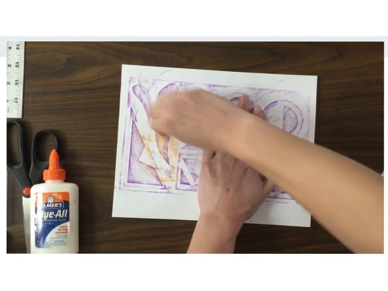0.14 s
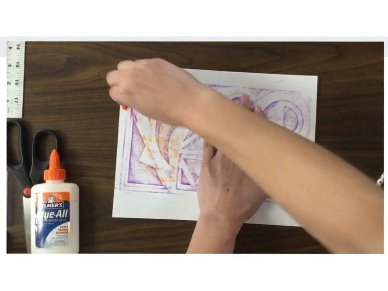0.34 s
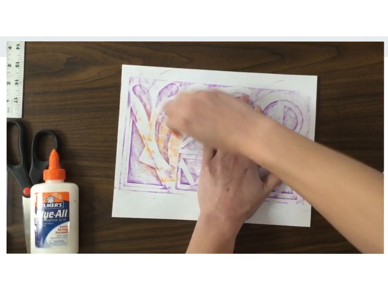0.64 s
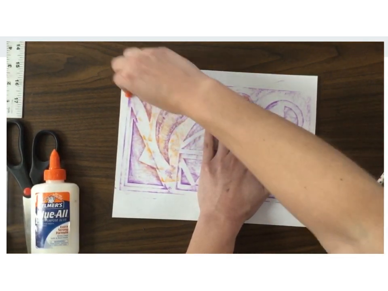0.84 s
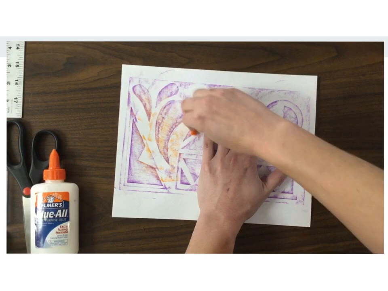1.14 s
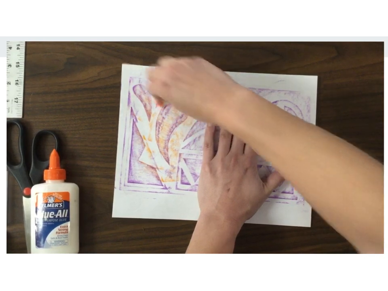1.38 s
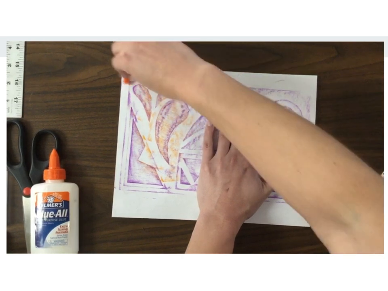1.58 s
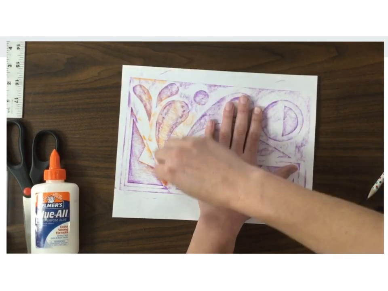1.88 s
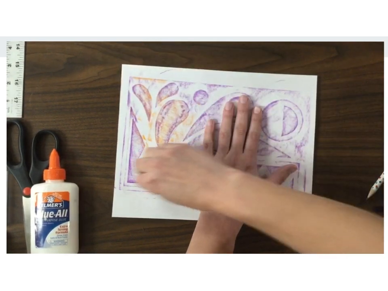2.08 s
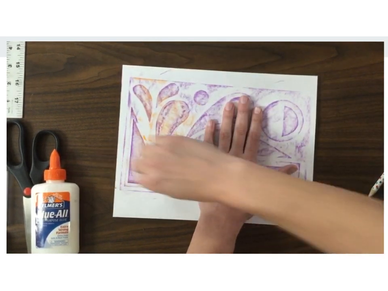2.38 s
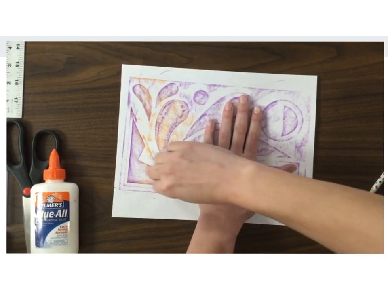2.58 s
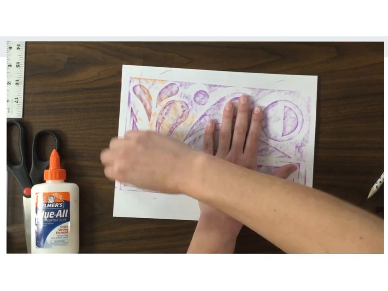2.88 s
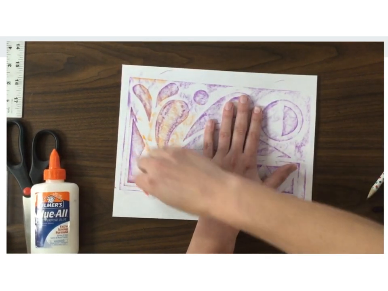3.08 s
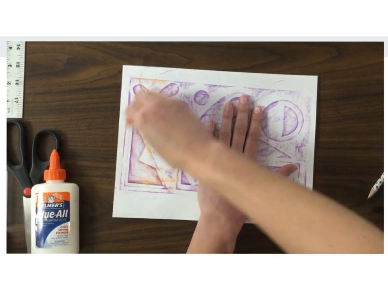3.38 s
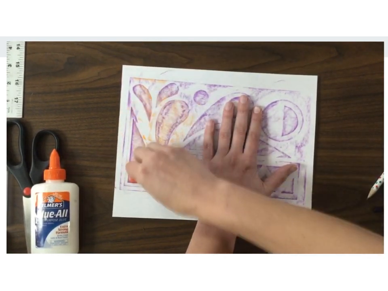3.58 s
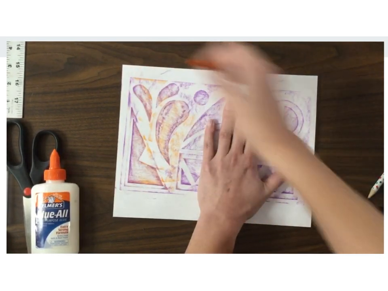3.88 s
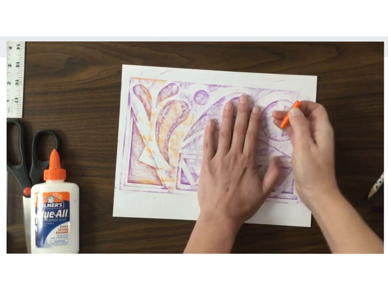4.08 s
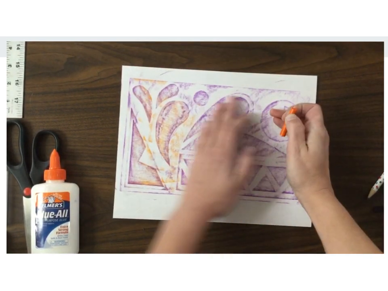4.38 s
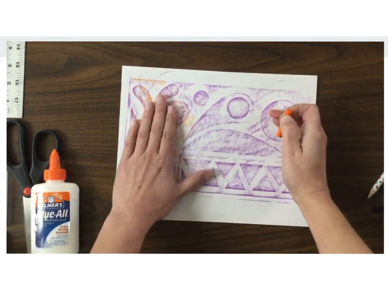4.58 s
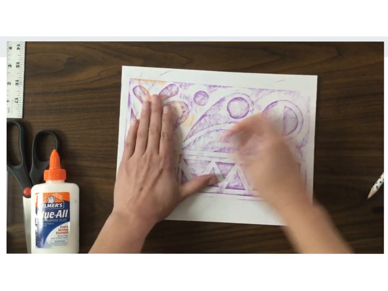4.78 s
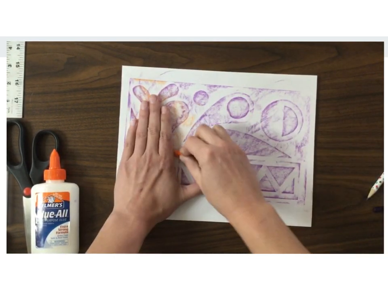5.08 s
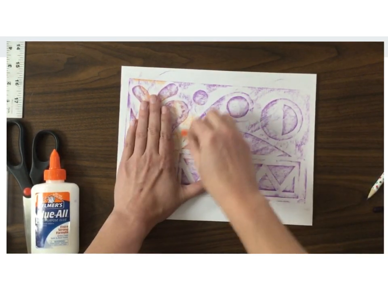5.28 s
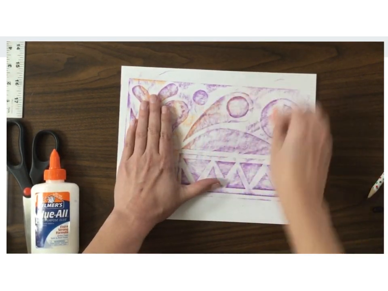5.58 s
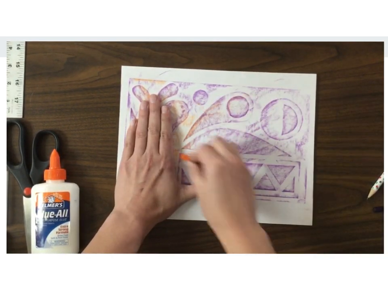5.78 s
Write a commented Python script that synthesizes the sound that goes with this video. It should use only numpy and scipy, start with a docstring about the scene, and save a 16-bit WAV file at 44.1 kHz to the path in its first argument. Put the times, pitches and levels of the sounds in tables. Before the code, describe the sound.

In a small quiet room with a steady low fan hum, a crayon taps down on paper over a textured board and rubs in short, hissing strokes with dull ridge thuds. Softer strokes and taps follow, then a quick rasp. A hand slides brightly over the faintly crinkling sheet before brief rubbing resumes. Close microphone, little reverberation.

```python
"""A fan hums throughout in a quiet room: wavering sines over a drone and filtered noise.
A crayon taps paper on a textured board on a wooden desk: noise bursts and damped desk modes.
It is rubbed in short strokes: filtered friction slips rasp on the fibres, and ridges underneath thud in the desk.
Later the sheet crinkles faintly in sparse ticks while a hand slides over it with a finer, brighter hiss.
Strokes and taps return until the end; a faint decaying noise tail stands for the room."""
import sys
import numpy as np
from scipy import signal
from scipy.fft import rfft, irfft, next_fast_len
from scipy.io import wavfile
from scipy.ndimage import uniform_filter1d, map_coordinates

SR = 44100
rng = np.random.default_rng(int(sys.argv[2]) if len(sys.argv) > 2 else 0)


def waveform_to_disk(signal):
    """Save audio, clipped to [-1, 1], as 16-bit WAV at the path in sys.argv[1]."""
    frames = np.transpose(np.atleast_2d(signal))
    scaled = np.clip(frames, -1, 1) * 32767
    samples = np.round(scaled).astype(np.int16)
    wavfile.write(sys.argv[1], SR, samples)


N = 261954
TIME = np.arange(N) / SR

# crayon strokes, levels before the trims of each sound; a negative swell starts loud and sinks:
# start_s, fastest_s, end_s, hiss_db, hiss_swell_db, rasp_db, rasp_swell_db, desk_rumble_db,
# boom_db (the deepest desk mode relative to the rest)
STROKE_MOVES = [ (0.101, 0.257, .39, -60, 12.5, -59, 20, -52, -10),
                (.635, 0.823, 0.955, -60, 9.5, -66, -6, -55.5, 1),
                (1.214, 1.52, 1.65, -60.5, 11.5, -70.5, 0.5, -52.5, -3),
                (2.017, 2.198, 2.323, -61.5, 13.5, -76.5, -3, -64, 6.5),
                (2.595, 2.797, 2.97, -66.5, 1.5, -76, 1, -61, 3),
                (3.175, 3.406, 3.458, -55.5, 18.5, -60, 23, -64.5, -12),
                (3.659, 3.764, 3.81, -53.5, 7, -53.5, 11, -61.5, -11),
                (4.93, 4.997, 5.25, -74, 12, -80.5, 2, -76, -8),
                (5.155, 5.17, 5.215, -65.5, 12, -66.5, 16, -60, -7),
                (5.281, 5.555, 5.6, -57.5, 10.5, -62, 19, -63.5, -23),
                (5.902, 5.935, 6.15, -74.5, -4, -79, 7, -65, -13)]
# resonances of desk and board, before random scatter: pitch_hz, ring_t60_s, level_db
DESK_MODES = [(64, .18, -12.5), (73.3, 0.89, -7), (104, .07, -1.5), (130, 0.11, -0.4), (175, 0.037, 1),
              (202.5, 0.078, 1.5), (233.4, .042, -0.5), (317, .06, -10.5), (387, .033, -18),
              (565, .028, -29)]
# spectrum of friction on paper fibres: frequency_hz, relative_level_db
HISS_SPECTRUM = [(1500, -27), (3500, -10), (5500, -7.5), (7000, -4.5), (8000, -4), (9300, -3),
                 (11500, -2.5), (13500, -6.5), (15500, -17)]
# spectrum of the coarser rasp under pressure: frequency_hz, relative_level_db
RASP_SPECTRUM = [(400, 5.5), (800, 0), (1400, 4), (2000, 0), (2600, -7.5), (3300, -5), (3900, -7.5),
                 (4500, -3), (5700, -17), (8000, -23)]

TOUCH_S, SWELL_SHAPE = 0.014, 1.09  # time to make full contact; bend of the swell
CRAYON_BRAKE, HAND_BRAKE = 1.02, 2.65  # the higher, the longer a movement keeps its speed before it stops
HISS_POWER, RASP_POWER = 1.12, 1.8  # how steeply each sound falls with the speed


def undb(db):
    """Decibels are logarithmic: return the amplitude gain."""
    return 10 ** (np.asarray(db) / 20)


def unit(x):
    """Normalization: scale to rms 1."""
    return x / np.sqrt(np.mean(x ** 2) + 1e-30)


def strength(x, window_s=0.00072):
    """Short-time power: scale a blow so that its loudest moment has rms 1."""
    power = uniform_filter1d(x ** 2, max(int(window_s * SR), 1))
    return x / np.sqrt(power.max())


def add(out, start, x):
    """Superposition: mix a short sound in at a time in seconds."""
    i = max(int(start * SR), 0)
    out[i:i + len(x)] += x[:max(N - i, 0)]


def colour(x, points):
    """Linear filtering by a spectrum of (Hz, dB) points, which falls away above its last point."""
    hz, db = np.transpose(points)
    size = next_fast_len(len(x) + 512)
    octave = np.log2(np.maximum(np.fft.rfftfreq(size, 1 / SR), .1))
    beyond = np.maximum(octave - np.log2(hz[-1]), 0)
    gain = undb(np.interp(octave, np.log2(hz), db) - 20 * beyond)
    return irfft(rfft(x, size) * gain, size)[:len(x)]


def walk(rate):
    """Low-passed noise makes a slow random fluctuation with rms 1."""
    return unit(colour(rng.standard_normal(N), [(rate, 0), (4 * rate, -40), (16 * rate, -120)]))


def fan():
    """Periodic hum with weaker frequency-modulated tones, over a drone and a soft rush of air."""
    # level of the hum, before its trim: time_s, level_db
    hum_levels = [(0.0, -56.5), (0.43, -64), (1.26, -58), (1.47, -55.5), (1.87, -54.5), (2.98, -61.5),
                  (4.32, -60), (4.83, -57.5), (5.39, -58), (5.94, -69)]
    # wavering tones: pitch_hz, width_hz (rate of wavering; twice the rms pitch deviation), level_db
    tone_bands = [(329, 20, -81.5), (358.3, 13.1, -74.5), (613.6, 8, -83), (709, 5.6, -81),
                  (690.5, 5, -82.5), (808, 4.9, -87), (1022, 6.7, -91.5), (1075, 11, -91),
                  (1364, 10, -96.5)]
    # spectrum of the drone: frequency_hz, relative_level_db
    drone_spectrum = [(25, -14), (45, -1.5), (70, 0.5), (140, 6.5), (220, -8.5), (280, -11), (360, 1),
                      (420, -13), (500, -18), (680, -14.5), (850, -22.5), (1100, -32.5)]
    # spectrum of the air: frequency_hz, relative_level_db
    air_spectrum = [(500, -21), (880, -3), (1400, -2), (1900, -5.5), (2500, -9.5), (3300, -14),
                    (5000, -16.5), (7000, -18), (10000, -15.5), (13000, -17.5), (15000, -24.5)]
    hum_hz, hum_trim_db, drone_db, air_db = 170.9, 1.0, -63.5, -80

    s, db = np.transpose(hum_levels)
    hum_phase = 2 * np.pi * np.cumsum(hum_hz + 0.63 * walk(3.7)) / SR
    # sqrt(2) gives each sine rms 1
    hum = np.sqrt(2) * np.sin(hum_phase) * undb(np.interp(TIME, s, db) + hum_trim_db)
    tones = np.zeros(N)
    for hz, width, level_db in tone_bands:
        phase = 2 * np.pi * np.cumsum(hz + width / 2 * walk(width)) / SR
        tones += undb(level_db) * np.sqrt(2) * np.cos(phase)
    drone = undb(drone_db) * unit(colour(rng.standard_normal(N), drone_spectrum))
    air = undb(air_db) * unit(colour(rng.standard_normal(N), air_spectrum))
    return hum + tones + drone + air


def ring(push, modes, detune, scatter_db=3.0):
    """Modal resonance: a push rings damped modes, whose pitch and strength shift with the place of contact."""
    t = TIME[:SR // 4]
    body = np.zeros(len(t))
    for hz, t60, db in modes:
        shift, swing = rng.standard_normal(2)
        decay = np.exp(-np.log(1000) * t / t60)
        body += undb(db + scatter_db * swing) * np.sin(2 * np.pi * hz * (1 + detune * shift) * t) * decay
    return signal.fftconvolve(push, body)[:len(push)]


def chatter(rise_s, fall_s, tail_db, tail_s):
    """Impact noise: a burst of tiny contacts dies quickly, with a faint flutter of the sheet after it."""
    t = TIME[:SR // 8]
    decay = np.exp(-t / fall_s) + undb(tail_db) * np.exp(-t / tail_s)
    return rng.standard_normal(len(t)) * (1 - np.exp(-t / rise_s)) * decay


def graze(lead_s, fade_s=0.0023):
    """Sliding friction: the crayon skims the paper for a moment before it lands."""
    t = TIME[:SR // 16]
    skim = rng.standard_normal(len(t)) * np.exp(-np.maximum(t - lead_s, 0) / fade_s)
    return strength(colour(skim, HISS_SPECTRUM))


def thud(hz):
    """Forced vibration: the board is pressed down and springs back; a slower push gives a deeper thud."""
    phase = 1.272 * hz * TIME[:SR // 4]
    push = np.sin(2 * np.pi * phase) * (phase < 1)  # one cycle
    return strength(ring(push, DESK_MODES, 0.015), 0.0043)


def taps(thud_lag_s=0.0016, stick_db=-1, sheet_db=-5, graze_db=-29):
    """Impact excitation: the crayon grazes the sheet, clicks, slaps it onto the board, and the desk answers."""
    # touches: time_s, click_db, treble_db, knock_db, thud_db, thud_hz (scales the push rate),
    # sheet_hz, stick_hz (rings, before random detuning), lead_s (graze ahead of the click)
    touches = [ (.064, -51.5, -46.5, -44.5, -33.5, 122, 1100, 7000, .005),
               (.6186, -33.5, -35, -33.5, -33, 103, 1370, 6970, .0045),
               (1.183, -53, -54.5, -54, -40.5, 82, 1097, 5030, 0.0034),
               (1.6065, -67, -54, -65, -48.5, 119, 1495, 10000, 0.00094),
               (1.988, -51.5, -53, -51, -43, 120, 616, 5470, .008),
               (2.521, -54.5, -53, -46.5, -45.5, 148, 492, 3300, 0.0042),
               (3.163, -67, -64, -63, -62, 119, 1740, 4430, 0.0012),
               (3.172, -66, -56.5, -68, -57, 101, 1300, 7300, .003),
               (3.643, -48, -53.5, -49, -41.5, 84, 1400, 4650, 0.0048),
               (4.115, -56, -53, -45.5, -46, 199, 464, 3360, 0.0082),
               (4.346, -57, -57, -60, -73, 151, 1780, 6350, .004),
               (4.9885, -70, -67, -73, -61, 154, 1400, 6330, 0.00095),
               (5.8943, -53.5, -48, -54.5, -39, 136, 400, 3080, 0.00096)]
    # spectra of click, knock and treble tick: frequency_hz, relative_level_db
    click_spectrum = [(1500, -15), (2400, -0.5), (2750, -4), (3100, 2.5), (3550, -5.5), (4200, 1),
                      (5000, -3.5), (5700, -11.5), (6400, -6)]
    knock_spectrum = [(250, 7), (450, 0), (700, -19.5), (1050, 1), (1400, -1), (1800, -5), (2300, -15.5)]
    tick_spectrum = [(4000, -20.5), (5700, -19.5), (6700, -3.5), (8200, 5), (9500, -1.5), (12000, -4.5),
                     (15500, -12)]

    out = np.zeros(N)
    for s, click_db, treble_db, knock_db, thud_db, thud_hz, sheet_hz, stick_hz, lead_s in touches:
        contact = chatter(rise_s=.0002, fall_s=0.0024, tail_db=-12.5, tail_s=0.0096)
        slap = chatter(rise_s=.0004, fall_s=0.0032, tail_db=-12.5, tail_s=0.013)
        crackle = chatter(rise_s=.0001, fall_s=0.0013, tail_db=-13, tail_s=0.0094)
        stick = strength(ring(crackle, [(stick_hz, .004, 0)], 0.0045))
        click = strength(colour(contact, click_spectrum)) + undb(stick_db) * stick
        # the sheet rings for a dozen cycles or so, hence longer at a low pitch
        sheet = strength(ring(contact, [(sheet_hz, 14 / sheet_hz, 0)], .01))
        knock = strength(colour(slap, knock_spectrum)) + undb(sheet_db) * sheet
        tick = strength(colour(crackle, tick_spectrum))
        # the graze grows more slowly with force than the treble tick does
        add(out, s - lead_s, undb(.5 * treble_db + graze_db) * graze(lead_s))
        add(out, s, undb(click_db) * click + undb(treble_db) * tick + undb(knock_db) * strength(knock))
        add(out, s + thud_lag_s, undb(thud_db) * thud(thud_hz))
    return out


def slips(rate, spread_db):
    """Stick-slip: tiny random releases of friction, a few much larger than the rest; rate is per second."""
    happens = rng.random(N) < rate / SR
    size = undb(spread_db * np.clip(rng.standard_normal(N), -2, 2))
    return unit(happens * rng.choice([-1, 1], N) * size)


def wander(x, spread_db, patch_hz, patch_s):
    """Moving excitation: the sheet's resonances come and go as the point of contact moves across it."""
    hz, s, bins = signal.stft(x, SR, nperseg=512)
    field = rng.standard_normal((256, 512))
    place = np.meshgrid(hz / patch_hz, s / patch_s, indexing="ij")
    gain = undb(spread_db * map_coordinates(field, place, order=2, mode="mirror"))
    return unit(signal.istft(bins * gain, SR)[1][:N])


def sweep(moves, brake, power):
    """Speed-dependent friction: a movement touches down, swells, then brakes to a stop."""
    gain = np.zeros(N)
    for start, fastest, end, db, swell_db in moves:
        contact = np.clip((TIME - start) / TOUCH_S + .5, 0, 1)
        swell = undb(-swell_db * np.interp(TIME, [start, fastest], [1, 0]) ** SWELL_SHAPE)
        speed = 1 - np.interp(TIME, [fastest, end], [0, 1]) ** brake
        gain += undb(db) * contact * swell * speed ** power
    return gain


def friction(moves, brake):
    """Two friction regimes: gains of the hiss and of the rasp, which fall differently with speed."""
    hiss = [(start, fastest, end, db, swell) for start, fastest, end, db, swell, *_ in moves]
    rasp = [(start, fastest, end, db, swell) for start, fastest, end, _, _, db, swell, *_ in moves]
    return sweep(hiss, brake, HISS_POWER), sweep(rasp, brake, RASP_POWER)


def pressure(start, length_s):
    """Normal force: the hand bears down at once, eases off along the stroke and lets go."""
    ease_db, release_s = 5, 0.072  # easing by the end of the stroke; the desk settles after it
    t = TIME - start
    eased = undb(-ease_db * np.clip(t / length_s, 0, 1) ** 2)
    return np.clip(t / TOUCH_S, 0, 1) * eased * np.exp(-np.maximum(t - length_s, 0) / release_s)


def rubbing(hiss_db=-1.46, rasp_db=-2.5, rumble_db=-0.5):
    """Stick-slip of wax on fibres; pressure adds a coarser rasp, and the relief shakes the desk's modes."""
    grip = walk(37)
    fibres = colour(slips(rate=16000, spread_db=4.0), HISS_SPECTRUM)
    grit = colour(slips(rate=4500, spread_db=4), RASP_SPECTRUM)
    hiss_gain, rasp_gain = friction(STROKE_MOVES, CRAYON_BRAKE)
    hiss = wander(fibres, spread_db=3.6, patch_hz=353, patch_s=0.055)
    hiss = hiss * undb(hiss_db + 0.7 * grip) * hiss_gain
    rasp = wander(grit, spread_db=5.0, patch_hz=204, patch_s=0.027)
    rasp = rasp * undb(rasp_db + 2.4 * grip) * rasp_gain

    relief_spectrum = [(45, -9.5), (70, 2.5), (130, 1.5), (300, -2.0), (700, 2.5)]
    relief = colour(slips(rate=280, spread_db=2.0), relief_spectrum)
    boom = unit(ring(relief, [(64, .2, 0)], .01))
    desk = unit(ring(relief, DESK_MODES, 0.012))
    rumble = np.zeros(N)
    for start, _, end, *_, db, boom_db in STROKE_MOVES:
        shaken = desk + undb(boom_db) * boom
        rumble += shaken * undb(rumble_db + db) * pressure(start, end - start)
    return hiss + rasp + rumble


def scratches(per_s=170, scratch_db=-9, ring_s=0.0007):
    """Stick-slip on coarser fibres: the wax snags now and then and lets go with a dry tick."""
    decay = np.exp(-TIME[:SR // 64] / ring_s)
    snags = signal.fftconvolve(np.abs(slips(rate=per_s, spread_db=2.5)), decay)[:N]
    hiss_gain, _ = friction(STROKE_MOVES, CRAYON_BRAKE)
    return undb(scratch_db) * unit(colour(snags * rng.standard_normal(N), HISS_SPECTRUM)) * hiss_gain


def ridges(body_db=-3, scrape_db=-1, bright_db=-5):
    """Impact and friction together: riding over a ridge gives a dull thud and a short scuff."""
    # bumps, levels before the trims: time_s, thud_db, scuff_db, thud_hz (scales the push rate)
    bumps = [(0.113, -36.5, -61.5, 170), (0.173, -33.5, -62.5, 89), (0.255, -31, -50.5, 130),
             (0.327, -43.5, -75, 203), (0.642, -46, -68, 80), (0.676, -28, -51, 144),
             (0.719, -31.5, -58, 213), (0.79, -29, -47.5, 217), (0.799, -35.5, -56, 235),
             (1.249, -30.5, -52.5, 205), (1.284, -31, -76, 130), (1.317, -31, -79, 79),
             (1.413, -30, -58, 105), (1.424, -30.5, -62, 212), (1.473, -29, -61, 122),
             (2.628, -40, -72, 160.4), (3.763, -37, -49, 216), (5.169, -48, -74, 156),
             (5.504, -42.5, -56.5, 167), (5.541, -36.5, -61, 146)]
    out = np.zeros(N)
    for s, thud_db, scuff_db, hz in bumps:
        catch = chatter(rise_s=0.00047, fall_s=0.004, tail_db=-6.5, tail_s=.013)
        bright = undb(bright_db) * strength(colour(catch, HISS_SPECTRUM))
        scuff = strength(colour(catch, RASP_SPECTRUM)) + bright
        add(out, s, undb(thud_db + body_db) * thud(hz))
        add(out, s, undb(scuff_db + scrape_db) * scuff)
    return out


def crinkle():
    """Sparse impulses: shifting fingers make the sheet give faint ticks while the hands change place."""
    start, end = 3.97, 5.16  # s
    per_s, level_db = 23, -87
    decay = np.exp(-TIME[:SR // 16] / 0.007)
    ticks = signal.fftconvolve(np.abs(slips(rate=per_s, spread_db=3)), decay)[:N]
    paper = unit(colour(rng.standard_normal(N), HISS_SPECTRUM))
    return undb(level_db) * unit(ticks) * paper * (TIME > start) * (TIME < end)


def brushing(hiss_db=-1.2, rasp_db=-5):
    """Soft sliding friction: skin on paper is finer, smoother and brighter than wax."""
    # hand movements, levels before the trims:
    # start_s, fastest_s, end_s, hiss_db, hiss_swell_db, rasp_db, rasp_swell_db
    hand_moves = [ (4.151, 4.161, 4.18, -69, 14, -79, 10), (4.295, 4.347, 4.368, -63, 13, -62, 19),
                  (4.355, 4.41, 4.45, -72, 1, -80, 1), (4.415, 4.48, 4.648, -53.3, 10, -68.5, 10),
                  (4.652, 4.665, 4.75, -74.5, 3, -83, 2), (4.78, 4.797, 4.83, -57.5, 18, -69, 12)]
    skin_spectrum = [(1500, -21), (3500, -7.5), (6000, -3.5), (7500, -0.5), (9000, 0.5), (11500, 1.5),
                     (13500, -1.5), (15500, -11)]
    rasp_spectrum = [(700, -9), (1600, 0), (3500, -7.0), (5500, -0.5)]
    hiss_gain, rasp_gain = friction(hand_moves, HAND_BRAKE)
    skin = colour(slips(rate=25000, spread_db=8.0), skin_spectrum)
    hiss = wander(skin, spread_db=3.0, patch_hz=395, patch_s=0.065) * undb(hiss_db) * hiss_gain
    rasp = unit(colour(rng.standard_normal(N), rasp_spectrum)) * undb(rasp_db) * rasp_gain
    return hiss + rasp


def walls(x, t60=0.23, wet_db=-17):
    """Reverberation: a small furnished room adds a faint, short, exponentially decaying tail."""
    t = TIME[:SR // 3]
    tail = colour(rng.standard_normal(len(t)), [(90, -2.5), (330, 8.0), (3000, -4.0), (12000, -10)])
    tail = tail * np.exp(-np.log(1000) * t / t60) * (t > .005)
    return x + undb(wet_db) * signal.fftconvolve(x, tail / np.linalg.norm(tail))[:N]


def scene():
    """Superposition: crayon and hands on the paper reverberate, and the fan is added."""
    crayon = taps() + rubbing() + scratches() + ridges()
    hands = crinkle() + brushing()
    return (walls(crayon + hands) + fan())[None]


def record(dry):
    """Band limiting: the deepest bass is thinned, and almost nothing is left above the top frequency."""
    low_hz, top_hz = 47, 15800
    thin = signal.sosfilt(signal.butter(4, low_hz, "high", fs=SR, output="sos"), dry)
    return signal.sosfilt(signal.ellip(10, .2, 70, top_hz, fs=SR, output="sos"), thin)


dry = scene()
out = record(dry)
waveform_to_disk(out)
```